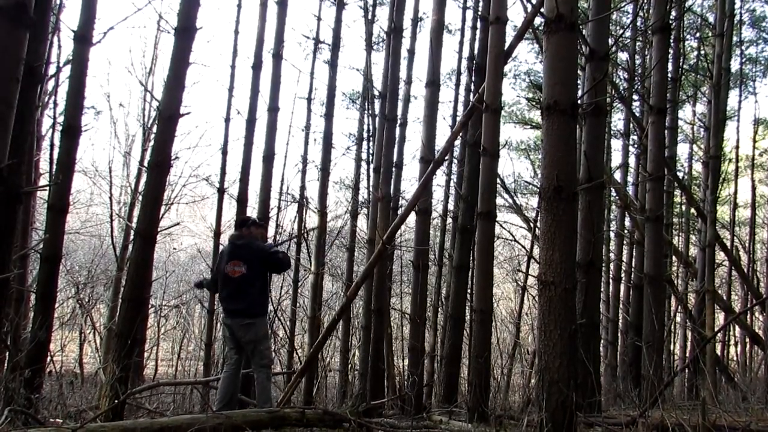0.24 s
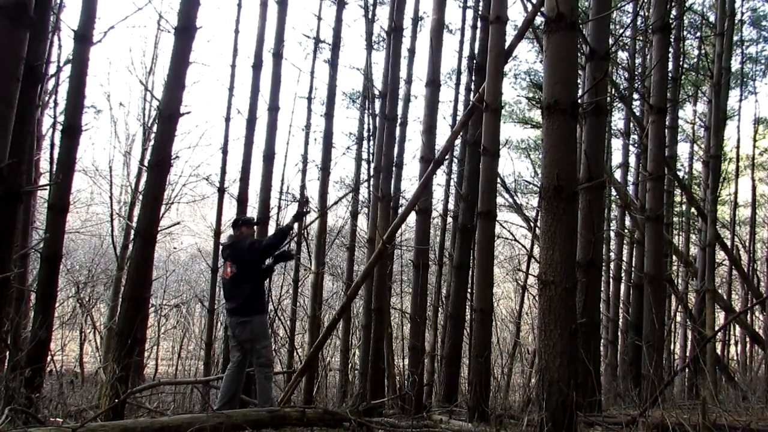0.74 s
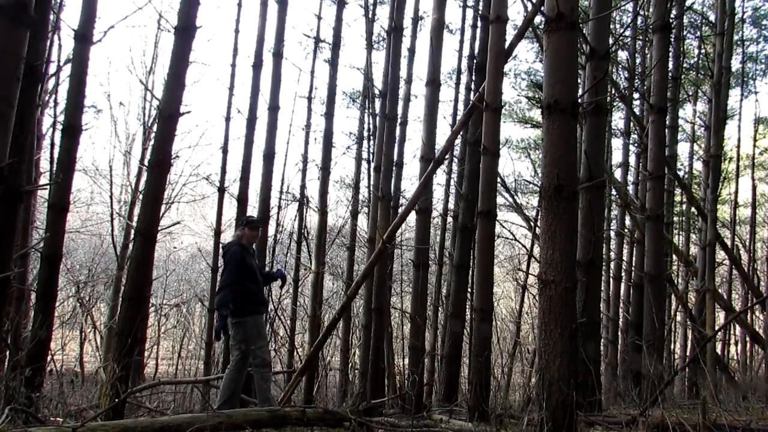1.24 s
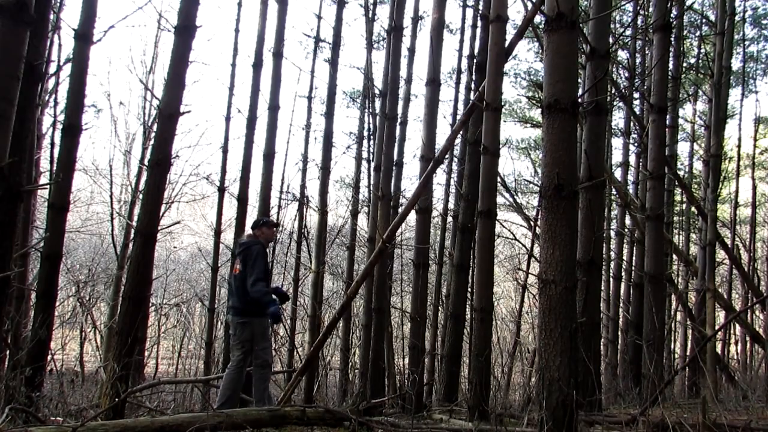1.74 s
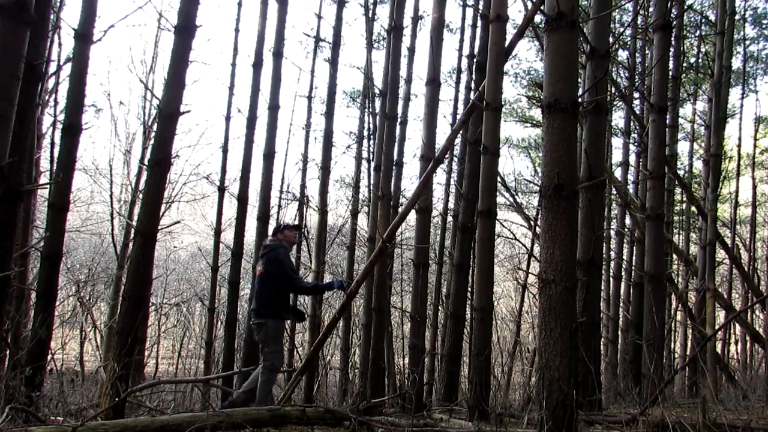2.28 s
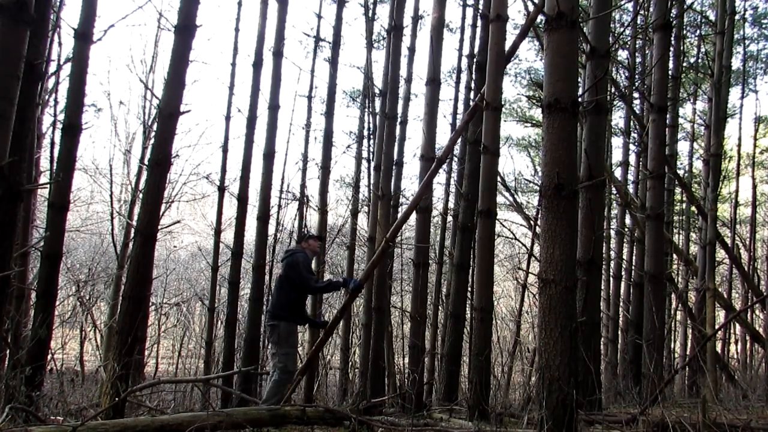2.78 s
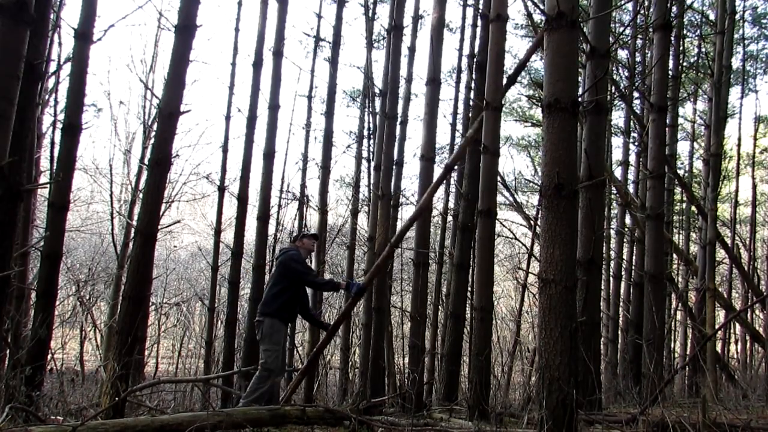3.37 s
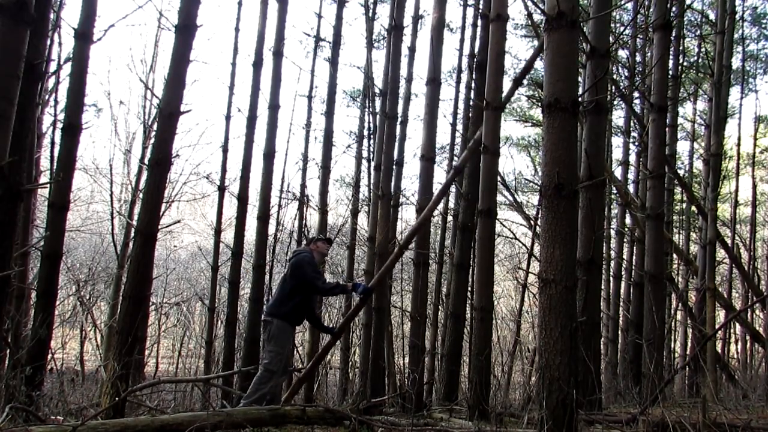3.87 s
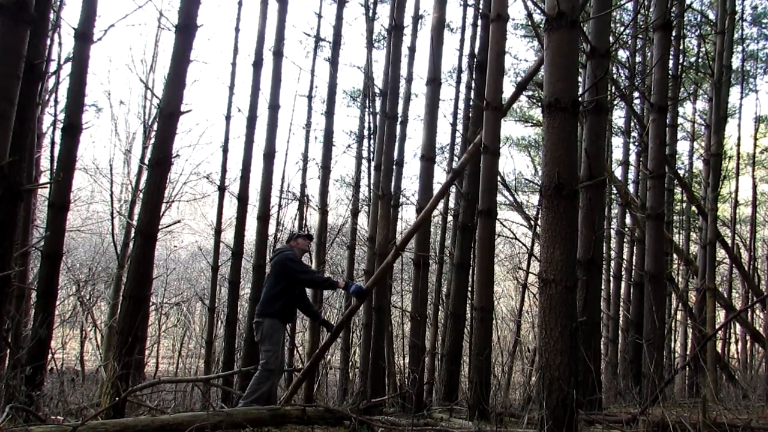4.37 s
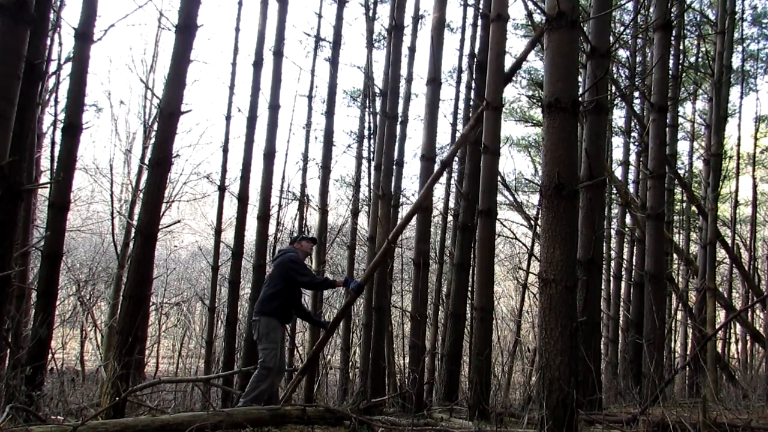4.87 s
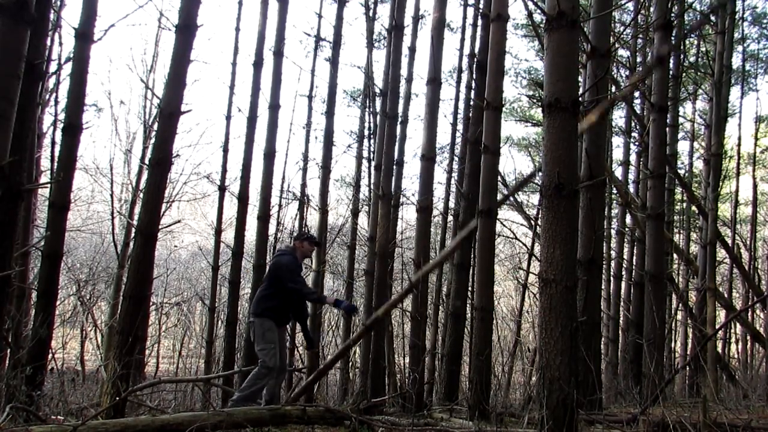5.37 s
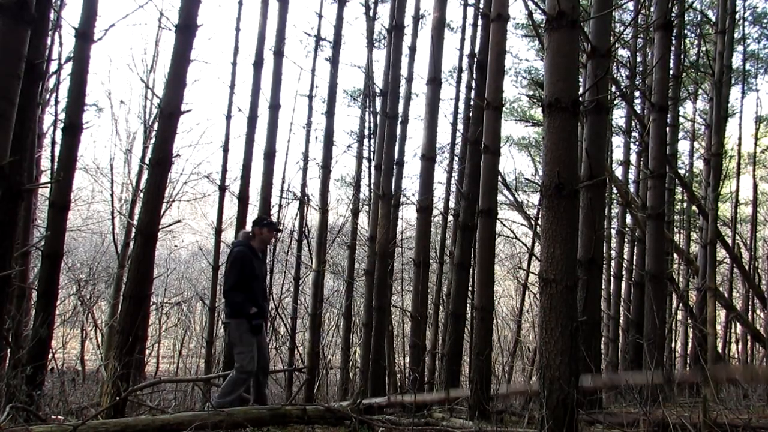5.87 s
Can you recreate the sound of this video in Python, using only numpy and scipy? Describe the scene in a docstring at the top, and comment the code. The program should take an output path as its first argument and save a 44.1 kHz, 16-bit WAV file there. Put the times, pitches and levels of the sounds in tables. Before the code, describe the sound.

Twigs snap and dry litter crunches in a pine wood, then a leaning dead trunk cracks loudly and crashes down through brittle branches.

```python
"""A faint far tone wavers over stirring pine litter, then twigs snap and thud and dry sticks clack.
A man in a pine wood tosses a stick aside, steps through litter and heaves a leaning dead trunk over.
The trunk knocks, groans and crashes through brittle branches over low, distant rumble: wood is struck modes,
fracture is short noise, litter is dense ticks, trees add a noise wash.
The loudest cracks overload the recorder, whose gain ducks and creeps back."""
import sys
import numpy as np
from scipy import signal
from scipy.fft import rfft, irfft, next_fast_len
from scipy.io import wavfile

SR = 44100
rng = np.random.default_rng(int(sys.argv[2]) if len(sys.argv) > 2 else 0)


def int16_out(signal):
    """Quantize to a 16-bit WAV file."""
    q = np.round(np.clip(np.atleast_2d(signal).T, -1, 1) * 32767)
    wavfile.write(sys.argv[1], SR, q.astype(np.int16))


N = 270597
TIME = np.arange(N) / SR
AGE = TIME[:SR // 3]   # seconds since a blow


def from_db(db):
    """Decibels to gain."""
    return 10 ** (np.asarray(db) / 20)


def rms_one(x):
    """Scale to unit rms."""
    return x / np.sqrt(np.mean(x ** 2) + 1e-20)


def peak_one(x):
    """Scale to unit peak."""
    return x / np.max(np.abs(x))


def at_hz(points, hz):
    """Read a spectrum on a log-frequency axis."""
    f, value = np.transpose(points)
    return np.interp(np.log(hz + 1), np.log(f), value)


def colour(x, spectrum):
    """Filter a sound by a spectrum of gains in dB."""
    length = x.shape[-1]
    size = next_fast_len(length + SR // 10)
    gain = from_db(at_hz(spectrum, np.fft.rfftfreq(size, 1 / SR)))
    return irfft(rfft(x, size) * gain, size)[..., :length]


def band(x, low_hz, high_hz):
    """Causal band-pass; the top edge is held below Nyquist."""
    edges_hz = [low_hz, min(high_hz, .45 * SR)]
    return signal.sosfilt(signal.butter(2, edges_hz, "band", fs=SR, output="sos"), x)


# left-right correlation at close microphones: (frequency [Hz], correlation [-1..1])
LIKENESS = [(60, 1), (250, 0.94), (600, 0.57), (2000, 0.87), (4000, 0.83), (8000, 0.49), (14000, 0.17)]


def stereo(pair):
    """Two unrelated sounds as mid and side: the close microphones agree less in the treble."""
    length = pair.shape[-1]
    size = next_fast_len(length)
    alike = np.clip(at_hz(LIKENESS, np.fft.rfftfreq(size, 1 / SR)), 0, .999)
    mid, side = rfft(pair, size)
    left_right = np.sqrt(1 + alike) * mid + np.sqrt(1 - alike) * side * [[1], [-1]]
    return irfft(left_right, size)[:, :length] / np.sqrt(2)


def hiss():
    """A short piece of stereo noise."""
    return stereo(rng.standard_normal((2, len(AGE))))


def fade(t60_s):
    """Exponential decay from the moment of a blow."""
    return np.exp(-np.log(1000) * AGE / max(t60_s, 1e-4))


def envelope(s, hold_s, attack_s, release_db_per_s):
    """Swell to 1 by time s, hold, then die away."""
    attack = np.clip(1 + (TIME - s) / max(attack_s, 1e-3), 0, 1)
    return attack * from_db(-np.clip(release_db_per_s * (TIME - s - hold_s), 0, 200))


def add(out, s, sound):
    """Mix a sound in at a time."""
    start = max(round(s * SR), 0)
    out[:, start:start + len(AGE)] += sound[..., :N - start]


def ring(modes, spread_db):
    """Struck modes, each with a new strength and sign at every blow."""
    out = 0
    for hz, db, t60_s in modes:
        strength = from_db(db + spread_db * rng.standard_normal()) * rng.choice([-1, 1])
        out = out + strength * np.sin(2 * np.pi * hz * AGE) * fade(t60_s)
    return out


def splinters(per_s, spread_db, tick_s=0.00031):
    """Shower of decaying stereo noise ticks of random size; rms 1."""
    sizes = from_db(spread_db * np.minimum(rng.exponential(1, len(AGE)), 3))
    hits = sizes * (rng.random(len(AGE)) < per_s / SR)
    return rms_one(hiss() * signal.lfilter([1], [1, -np.exp(-1 / (tick_s * SR))], hits + 1e-18))


# thick limb breaks: (time [s], relative level [dB])
BREAK = [(4.5700, -4.5), (4.5719, 10.5), (4.5829, 1.5)]
# limb modes: (frequency [Hz], relative level [dB], t60 [s])
LIMB = [(590, -5.5, 0.11), (1030, -5, 0.16), (1140, 0, 0.07), (1442, 1.5, 0.066), (2000, 0, 0.15),
        (2314, -5, 0.11), (3063, -14, 0.18), (4250, -8.5, 0.042)]
# spectrum of tearing: (frequency [Hz], gain [dB])
LIMB_CRACK = [(120, -40), (250, -38), (600, -6), (1050, 1), (2100, -5), (2700, -6), (4200, -4.5),
              (6000, -16.5), (10000, -12.5), (15000, -66)]


def limb(crack_s=0.0011, splinter_t60_s=0.17, splinter_db=0.5, modes_db=-5.5, bend_db=-8.5):
    """A thick limb gives way in quick stages, each a short crack; it rings and sheds splinters."""
    out = np.zeros((2, N))
    falling_hz = 950 + 1200 * fade(0.0437)   # in a bending wave the high pitches arrive first
    bend = from_db(bend_db) * np.sin(2 * np.pi * np.cumsum(falling_hz) / SR) * fade(0.042)
    for s, level_db in BREAK:
        crack = peak_one(band(hiss()[0] * np.exp(-(AGE / crack_s) ** 2), 1370, 3550))
        tearing = colour(splinters(per_s=1800, spread_db=2.0), LIMB_CRACK)
        tearing = peak_one((tearing + tearing.mean(0)) * fade(splinter_t60_s))
        modes = peak_one(ring(LIMB, spread_db=-0.5))
        sound = crack + from_db(splinter_db) * tearing + bend + from_db(modes_db) * modes
        add(out, s, from_db(level_db) * sound)
    return band(out, 150, SR / 2)   # a limb radiates no deep bass


def fracture(noise, force_db, length_s=0.00088, crisp_db=-14.0, lowest_hz=600):
    """Fibres part in about a millisecond, with little bass; harder breaks have crisper edges. Peak 1."""
    edge = from_db(crisp_db + force_db) * rms_one(band(hiss(), 6200, 12500))
    burst = (rms_one(noise) + edge) * np.exp(-(AGE / length_s) ** 2)
    return peak_one(band(burst, lowest_hz, SR / 2))


def twig(hz, tear_t60_s=0.0069, falloff_db=19.5, ring_cycles=130):
    """Damped modes shaken while fibres tear; total energy equals 10 ms at rms 1."""
    modes = []
    for ratio in [1, *rng.uniform(0.56, 1.411, 6)]:
        mode_hz = hz * ratio
        modes.append((mode_hz, -falloff_db * np.sqrt(abs(np.log2(ratio))), ring_cycles / mode_hz))
    fibres = hiss()[0] * fade(tear_t60_s)
    fibres[0] += np.linalg.norm(fibres)   # the first fibre to fail is the strongest
    sound = signal.fftconvolve(ring(modes, spread_db=4.5), fibres)[:len(AGE)]
    return rms_one(sound) * np.sqrt(.01 * SR / len(AGE))


# snapping twigs: (time [s], fracture level [dB], scatter level [dB], treble over scatter [dB],
# twig pitch [Hz], twig tone over scatter [dB]); levels are relative
SNAPS = [(0.622, -23.5, -50, -4, 1420, 8.5), (1.0919, -24, -82, 19, 5000, -10),
         (1.271, -29, -40, -2, 2880, -9), (1.2927, -20, -44, 0, 3940, -1),
         (1.3328, -7, -29.5, 11.5, 3470, -4), (1.3481, -8, -23.5, 7, 1420, -8),
         (1.4256, -13, -33, 4, 3470, -1.5), (1.431, -27, -30.5, -9, 4220, -3),
         (1.589, -32, -46, 13.5, 3500, -7), (1.718, -29.5, -50, -16, 2080, 0),
         (1.809, -46, -40, 4.5, 1640, -12), (2.1228, -29.5, -58, 1, 5420, 9),
         (2.7642, -24, -57, 13, 1450, 8), (2.863, -36, -43.5, 6.5, 5000, -21),
         (3.003, -34, -44, 2.5, 4200, .5), (3.0575, -19, -34.5, -8, 1755, 0),
         (3.153, -14.5, -35, 3, 1560, -6), (3.189, -26, -41, -6, 1900, 1), (3.315, -28, -40, -6, 2360, -20),
         (3.575, -22.5, -38, -6, 2000, -15), (3.9658, 7, -10.5, 5, 4210, -12),
         (4.6772, 4, -21.5, 9, 1603, 4), (4.71, -5, -19.5, 6, 4560, -12), (4.7153, 9, -19.5, 7.5, 2210, 0),
         (4.7283, -3, -24.5, -7, 1944, 3), (5.0402, -16, -40, 10.5, 2960, -12),
         (5.0768, -15, -15.5, 2, 2114, -0.5), (5.1037, -10, -24, 4.5, 5020, 1),
         (5.1294, -6, -29, 11.5, 4010, -2), (5.1613, -8.5, -21, -5, 1645, -5),
         (5.2024, -22, -37.5, 7.5, 3250, 7), (5.3015, -1.5, -26, 9, 3860, 2.5),
         (5.3454, 0, -35, 15, 3110, 7), (5.3596, -4, -24.5, 8.5, 3580, 3.5),
         (5.4493, 0, -20.5, 8, 5100, -8), (5.4869, -7, -22, 3.5, 3130, -5), (5.509, -16, -25, -10, 3350, 1),
         (5.5324, 2.5, -28, 11, 1564, 3.5), (5.581, -26, -31.5, 9, 1280, 7),
         (5.6807, -2.5, -24, 4, 2230, 0.5), (5.8301, -5, -29, 7.5, 3850, -17),
         (5.8685, -7, -18.5, -2, 3140, -5), (5.9066, 1, -26, 12, 2720, 1.5),
         (5.9164, -8, -27.5, -11, 1840, -5), (5.936, -13, -25.5, -4, 4520, -4),
         (5.952, -8, -29, 0, 3150, -9), (5.9919, -1, -21.5, -6, 3360, 6), (5.993, -7, -16, -0.5, 5500, 4),
         (6.049, -5, -30, 12.5, 5560, 4), (6.083, -8, -22, 3, 4800, -0.5), (6.096, 0, -16.5, 2.5, 1314, -3)]


def snaps(ring_db=-1.0, ring_t60_s=0.073, after_db=-10.5, after_t60_s=0.27, width=0.6, pan_db=0.83,
          bass_db=-8.5, lead_s=0.001082):
    """A twig tears and rings, parts with a crack that scatters off the ground, and sheds splinters."""
    out = np.zeros((2, N))
    for s, crack_db, level_db, bright_db, hz, tone_db in SNAPS:
        # thin wood rings weakly in the bass
        bands = [(level_db + bass_db, 280, 1200), (level_db, 1200, 4000), (level_db + bright_db, 4000, 10500)]
        noise = [from_db(db) * rms_one(band(hiss(), low, high)) for db, low, high in bands]
        scatter = sum(noise)
        shower = splinters(per_s=420, spread_db=2.5)
        debris = sum(from_db(db) * rms_one(band(shower, low, high)) for db, low, high in bands)
        middle = scatter.mean(0)
        direct = middle + width * (scatter - middle)   # the first wave reaches both microphones alike
        sound = from_db(crack_db) * fracture(direct[:, ::-1], crack_db)   # noise reversed in time
        sound += from_db(ring_db) * scatter * fade(ring_t60_s)
        sound += from_db(after_db) * debris * fade(after_t60_s)
        pan = from_db(pan_db * rng.normal(1, 1) * np.array([[-1], [1]]) / 2)
        add(out, s, sound * pan)
        # the tearing sounds before the twig parts
        add(out, s - lead_s, from_db(level_db + tone_db) * twig(hz) * pan)
    return out


# trunk bumps and slips: (time [s], relative level [dB], slip decay [s], favoured contact pitch [Hz])
KNOCKS = [(3.005, -33.5, 0.021, 1030), (3.057, -34.5, 0.031, 1960), (3.129, -33.5, 0.018, 1500),
          (3.165, -32, 0.017, 2000), (3.187, -35, 0.017, 1160), (3.272, -35, 0.014, 1260),
          (3.476, -38, 0.0074, 1310), (3.525, -32, 0.024, 980), (3.697, -37.5, 0.025, 1010),
          (3.730, -36, 0.007, 1090), (3.803, -43, 0.0069, 1500), (3.825, -31, 0.009, 1130),
          (3.881, -37.5, 0.0085, 1740), (4.053, -28, 0.0096, 620), (4.086, -36, 0.055, 1030),
          (4.143, -35, 0.017, 950), (4.636, -15, 0.015, 1200), (5.040, -26.5, 0.015, 620),
          (5.077, -21, 0.013, 1020), (5.269, -22.5, 0.022, 900), (5.301, -20.5, 0.0081, 850),
          (5.359, -25.5, 0.0079, 804), (5.443, -23, 0.011, 820), (5.484, -27, 0.0088, 536),
          (5.519, -23, 0.013, 1060), (5.577, -33, 0.0078, 1020), (5.631, -28, 0.006, 1440),
          (5.68, -34, 0.011, 920), (6.098, -29, 0.021, 1130)]
# trunk modes: (frequency [Hz], relative level [dB], t60 [s])
TRUNK = [(231, -1, 0.083), (325.6, 9, 0.082), (532, 3, 0.051), (604, -9, 0.2), (790, -5, 0.017),
         (874, 0, 0.045), (1056, 1, 0.045), (1186, -1.5, 0.044), (1450, -4.5, 0.036), (1730, -1.5, 0.028),
         (2310, -6.5, 0.031), (2870, -5.5, 0.032)]


def knocks(rasp_db=-11.5, focus_db_per_octave=10.5, bump=0.52, detune=0.023):
    """The trunk bumps, then sticks and slips: the slips shake its hollow modes and rasp the bark."""
    out = np.zeros((2, N))
    for s, level_db, length_s, contact_hz in KNOCKS:
        slips = splinters(per_s=490, spread_db=2.0) * np.exp(-AGE / length_s)
        slips[:, 0] += bump * np.linalg.norm(slips[0])
        modes = []
        for hz, db, t60_s in TRUNK:
            shifted_hz = hz * rng.normal(1, detune)   # the trunk finds new supports
            modes.append((shifted_hz, db - focus_db_per_octave * abs(np.log2(hz / contact_hz)), t60_s))
        body = signal.fftconvolve(slips.mean(0), ring(modes, spread_db=5.0))[:len(AGE)]
        rasp = rms_one(band(slips, contact_hz / 2, contact_hz * 3))
        sound = rms_one(body) + from_db(rasp_db) * rasp
        add(out, s, from_db(level_db) * sound * np.sqrt(length_s * SR / len(AGE)))
    return out


# bending trunk groans: (time [s], time under load [s], starting pitch [Hz], relative level [dB])
GROANS = [(5.047, 0.009, 335, -32), (5.084, 0.032, 347.3, -24.5), (5.28, 0.018, 339, -31.5)]


def groan(waver_hz=7.6, sag_hz_per_s=220, roughness=.33):
    """Rough friction keeps a low bending mode of the trunk sounding; its pitch sags as the wood gives."""
    friction, wander = (rms_one(band(noise, 23, 104)) for noise in rng.standard_normal((2, N)))
    out = 0
    for s, hold_s, start_hz, db in GROANS:
        hz = start_hz - sag_hz_per_s * np.clip(TIME - s, 0, hold_s) + waver_hz * wander
        load = envelope(s, hold_s, attack_s=0.015, release_db_per_s=239)
        out = out + from_db(db) * load * np.sin(2 * np.pi * np.cumsum(hz) / SR)
    return (1 + roughness * friction) * out


# dry sticks clack: (time [s], relative level [dB], lower mode [Hz], upper mode [Hz], upper over lower [dB])
CLACKS = [(0.721, -26, 1790, 2390, -5), (1.253, -24, 2860, 3620, 7), (1.294, -24, 1380, 3930, 5),
          (2.826, -37.5, 2200, 2730, 3), (3.163, -27, 1790, 2570, 1), (5.359, -20.5, 3000, 3570, 0),
          (5.579, -9, 1880, 2020, 3), (5.831, -17, 1484, 2130, -8)]


def clacks(tick_db=-2.0, ring_t60_s=.04, chatter_s=0.0027):
    """Two dry sticks meet: a brief chatter of contact, and two wooden modes that die quickly."""
    out = np.zeros((2, N))
    for s, level_db, low_hz, high_hz, high_db in CLACKS:
        wood = ring([(low_hz, 0, ring_t60_s), (high_hz, high_db, ring_t60_s)], spread_db=1)
        wood *= 1 - np.exp(-2 * AGE / chatter_s)
        tick = band(hiss() * np.exp(-AGE / chatter_s), low_hz / 2, high_hz * 2)
        add(out, s, from_db(level_db) * (peak_one(wood) + from_db(tick_db) * peak_one(tick)))
    return out


# wood and boots land on soft ground: (time [s], relative level [dB], pitch [Hz], tick over ground [dB])
THUDS = [(1.045, -12.5, 193, -0.5), (1.06, -21, 440, -12), (1.145, -25, 315, -21), (1.186, -27.5, 418, -16),
         (1.347, -14.5, 268, -33), (1.351, -17.5, 470, -28), (1.432, -23.5, 128, -2),
         (2.715, -25.5, 435, -20), (3.151, -27.5, 250, -16), (5.680, -25, 189, -16), (5.993, -17, 319, -21),
         (6.011, -22, 210, -5), (6.108, -20, 193, -21), (6.114, -11, 347, -12)]


def thuds(cycles=12.4, rise_s=0.0013, tick_t60_s=0.0089, soil_db=-6.0):
    """Soft ground answers a blow with a contact tick, low damped cycles and a dull crush of soil."""
    out = np.zeros((2, N))
    for s, level_db, hz, tick_db in THUDS:
        t60_s = cycles / hz
        modes = [(hz, 0, t60_s), (hz * 1.24, -8, t60_s / 2), (hz * 1.89, -8, t60_s / 2)]
        give = peak_one(ring(modes, spread_db=-3))
        crush = peak_one(band(hiss(), hz * 0.54, hz * 2.52) * fade(t60_s))
        ground = (give + from_db(soil_db) * crush) * (1 - np.exp(-AGE / rise_s))   # the soil yields gradually
        tick = peak_one(band(hiss(), 390, 1400) * fade(tick_t60_s))
        add(out, s, from_db(level_db) * (peak_one(ground) + from_db(tick_db) * tick))
    return out


def crackle(spectrum, per_s, spread_db):
    """Countless tiny fractures of random size and sign; rms 1."""
    sizes = from_db(spread_db * np.minimum(rng.exponential(1, (2, N)), 4)) * rng.choice([-1, 1], (2, N))
    hits = sizes * (rng.random((2, N)) < per_s / SR)
    return rms_one(colour(stereo(hits), spectrum))


# litter crushed by boots or falling wood: (time [s], time under load [s], sticks [dB], leaves [dB]), relative
CRUNCHES = [(0, 0.26, -54, -58.5), (.37, 0.065, -47.5, -52.5), (0.578, 0.067, -44.5, -47.5),
            (.73, 0.026, -45.5, -50), (1.05, 0.15, -61, -52), (1.262, 0.022, -50.5, -39.5),
            (1.345, 0.04, -38, -35.5), (1.438, 0.011, -33, -38.5), (1.53, 0.096, -45, -46.5),
            (1.8, 0.023, -41, -51.5), (1.9, 0.064, -53, -50.5), (2.59, 0.048, -50, -52.5),
            (2.69, 0.061, -45, -49), (3.035, 0.039, -43, -46), (3.141, 0.049, -37.5, -41),
            (3.29, 0.19, -52, -53), (3.52, 0.12, -47, -49), (3.68, 0.2, -48, -54), (4, 0.15, -38.5, -37.5),
            (4.198, 0.13, -44.5, -49.5), (4.4, 0.11, -39, -47), (4.595, 0.042, -20.5, -22.5),
            (5.091, 0.22, -50, -42), (5.316, 0.027, -40.5, -29.5), (5.46, 0.01, -45, -30),
            (5.52, 0.055, -49, -28.5), (5.685, 0.041, -48, -35.5), (5.859, 0.096, -42, -30.5),
            (6, 0.018, -33, -29), (6.095, 0.0092, -31.5, -27)]
# litter spectra: (frequency [Hz], gain [dB])
STICKS = [(150, -5.5), (320, 6), (700, -0.5), (1200, -5), (2000, -4.5), (3500, -13.5), (7000, -32.5)]
LEAVES = [(1200, -57), (2500, -7), (4000, -2.5), (8000, -2.5), (11000, -5), (13500, -8), (16000, -45)]
TWIGLETS = [(400, -17), (1200, 3.5), (2200, -13), (5000, -0.5), (9000, -7), (15000, -25)]


def litter(sticks_db=-1.0, twiglets_db=-6.0, clump_db=2.0):
    """Sticks grind, twiglets tick and leaves crumple in clumps under boots and falling wood, then settle."""
    sticks, leaves = from_db(-60), from_db(-61)   # faint stirring between crunches
    for s, hold_s, stick_db, leaf_db in CRUNCHES:
        load = envelope(s, hold_s, attack_s=0.038, release_db_per_s=159)
        sticks = np.maximum(sticks, from_db(stick_db) * load)
        leaves = np.maximum(leaves, from_db(leaf_db) * load)
    clumps_db = clump_db * rms_one(band(rng.standard_normal(N), 16.4, 60))
    grinding = from_db(sticks_db) * sticks * crackle(STICKS, per_s=900, spread_db=-0.5)
    crumpling = leaves * crackle(LEAVES, per_s=5600, spread_db=2.5)
    ticking = from_db(twiglets_db) * leaves * crackle(TWIGLETS, per_s=150, spread_db=-1.0)
    return from_db(clumps_db) * (grinding + crumpling + ticking)


# colour of the wash: (frequency [Hz], gain [dB])
ECHO_COLOUR = [(250, -3.5), (1200, 5), (4000, 1.5), (8000, -1.5), (14000, -31)]


def forest(x, t60_s=0.68, wet_db=-14.0, build_s=0.0012):
    """Countless trunks scatter each band into a diffuse wash that builds up and dies away."""
    out, edges_hz = 0, np.geomspace(200, 16000, 8)
    decay, build = np.exp(-np.log(1e6) / (t60_s * SR)), np.exp(-1 / (build_s * SR))
    wash = stereo(rng.standard_normal((2, N)))
    for low, high in zip(edges_hz, edges_hz[1:]):
        power = band(x.mean(0) + 1e-9, low, high) ** 2
        power = signal.lfilter([1 - decay], [1, -decay], power)
        power = signal.lfilter([1 - build], [1, -build], power)
        wash = np.roll(wash, SR // 2, axis=1)   # unrelated noise in each band
        gain = from_db(at_hz(ECHO_COLOUR, np.sqrt(low * high)))
        out = out + gain * np.sqrt(power) * rms_one(band(wash, low, high))
    return from_db(wet_db) * out


def whistle(pitch_hz=1545, waver_hz=24.2, flutter_db=2.3, octave_end_db=-2.48, octave_width_hz=450,
            level_db=-57, end_s=0.426):
    """A brief far tone wavers and flutters, with a hoarse octave of band noise above it."""
    hz = pitch_hz + waver_hz * rms_one(band(rng.standard_normal(N), 3.8, 55))
    flutter = from_db(flutter_db * rms_one(band(rng.standard_normal(N), 6.5, 30)))
    tone = rms_one(np.sin(2 * np.pi * np.cumsum(hz) / SR) * flutter)
    low_hz, high_hz = 2 * pitch_hz - octave_width_hz / 2, 2 * pitch_hz + octave_width_hz / 2
    octave = from_db(octave_end_db) * rms_one(band(rng.standard_normal(N), low_hz, high_hz))
    swell = np.minimum(TIME / end_s, 1)   # the octave grows towards the end
    shape = envelope(0, end_s, attack_s=.01, release_db_per_s=349)
    return from_db(level_db) * shape * (tone + swell * octave)


# air noise and far hum spectra: (frequency [Hz], gain [dB])
AIR = [(20, -28), (45, -7.5), (65, -2), (160, -2.5), (420, -18), (950, -14.5), (1600, -24), (2500, -31),
       (8000, -37), (16000, -43)]
DRONE = [(55, -78), (74, -1.5), (82, 11), (90, -17.5), (115, -31.5), (400, -100)]
# gain of the low rumble: (time [s], level [dB])
RUMBLE = [(.2, -2.5), (1.45, 3), (2.3, -1), (3.8, 0), (4.3, 4), (5.1, 4.5)]


def distance(air_db=-43.5, drone_db=-48.0, rumble_top_hz=170):
    """Low wind rumble and a far hum, which swell and ease together under the steady hiss of the air."""
    air = from_db(air_db) * rms_one(colour(stereo(rng.standard_normal((2, N))), AIR))
    air += from_db(drone_db) * rms_one(colour(rng.standard_normal(N), DRONE))
    bass = signal.sosfiltfilt(signal.butter(2, rumble_top_hz, fs=SR, output="sos"), air)
    swell_db = np.interp(TIME, *np.transpose(RUMBLE))
    return air - bass + from_db(swell_db) * bass


def scene():
    """Breaking wood among the trees, over the distant background."""
    wood = limb() + snaps() + knocks() + groan() + clacks()
    return wood + forest(wood) + band(thuds(), 71, 14000) + litter() + whistle() + distance()


def record(dry, threshold_db=-3.0, release_db_per_s=13.5, attack_s=0.0021, stop_hz=16650):
    """Gain control ducks after loud cracks, their first peaks clip, and the top is cut."""
    over_db = np.maximum(20 * np.log10(np.abs(dry).max(0) + 1e-9) - threshold_db, 0)
    # hold each peak, falling at the release rate
    held_db = np.maximum.accumulate(over_db + release_db_per_s * TIME) - release_db_per_s * TIME
    pole = np.exp(-1 / (attack_s * SR))
    ducked = dry * from_db(-signal.lfilter([1 - pole], [1, -pole], held_db))
    top_cut = signal.cheby2(20, 75, stop_hz, fs=SR, output="sos")
    return signal.sosfilt(top_cut, np.clip(ducked, -1, 1))


dry = scene()
out = record(dry)
int16_out(out)
```